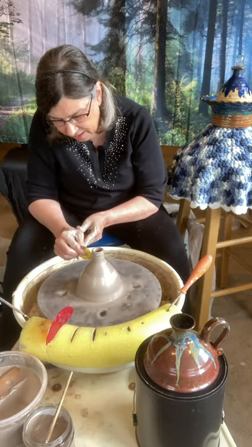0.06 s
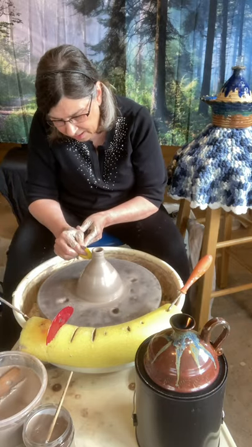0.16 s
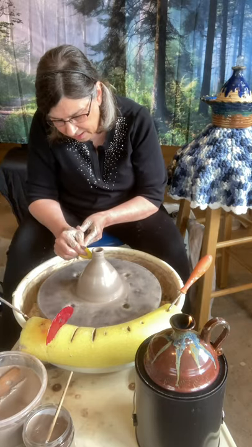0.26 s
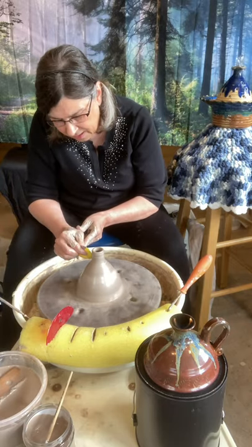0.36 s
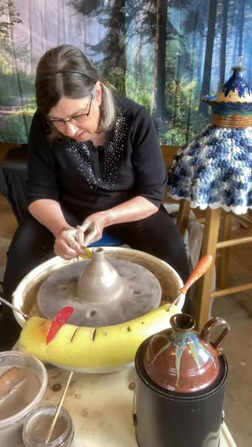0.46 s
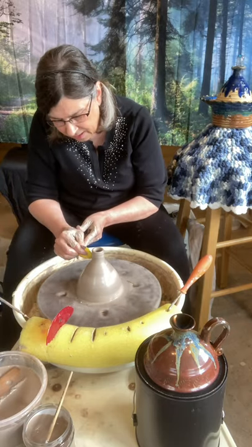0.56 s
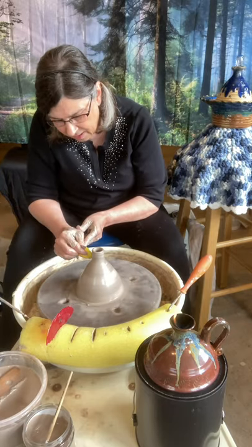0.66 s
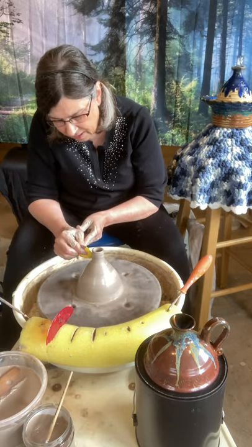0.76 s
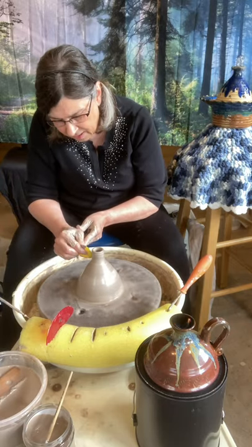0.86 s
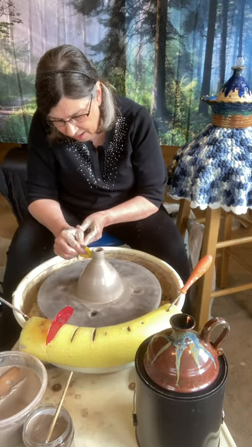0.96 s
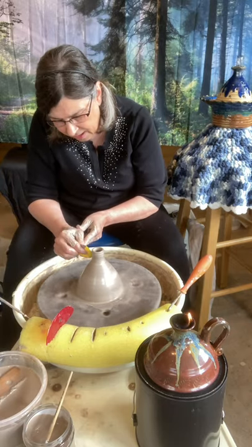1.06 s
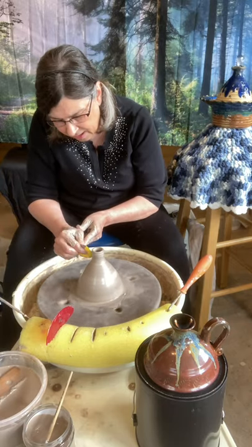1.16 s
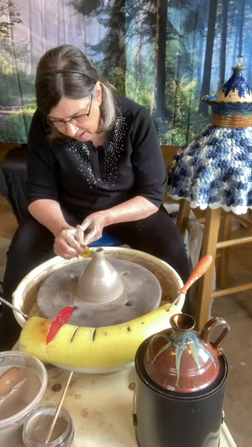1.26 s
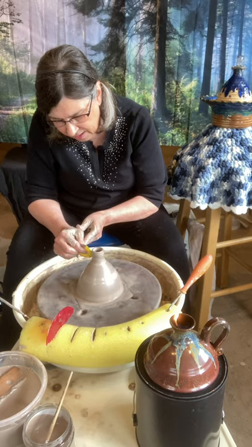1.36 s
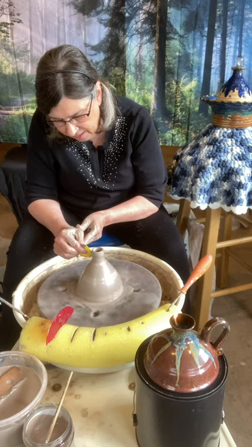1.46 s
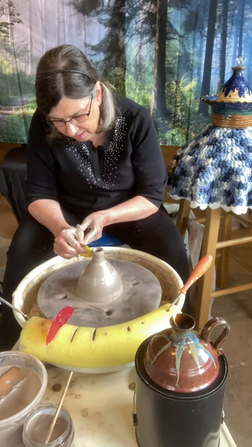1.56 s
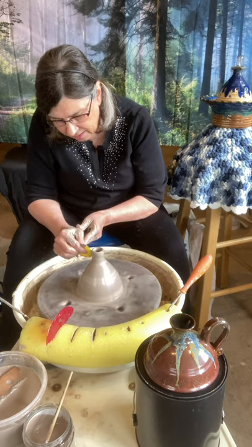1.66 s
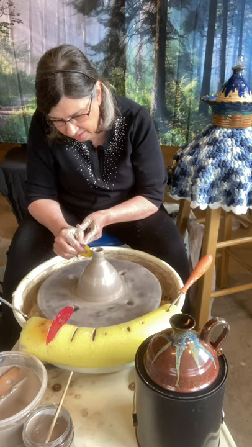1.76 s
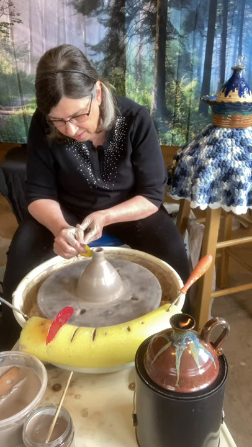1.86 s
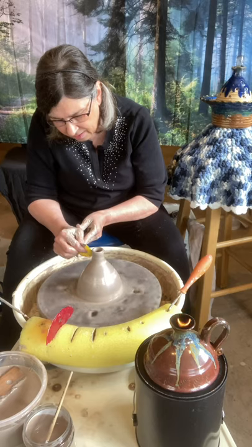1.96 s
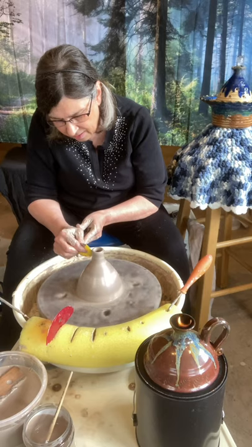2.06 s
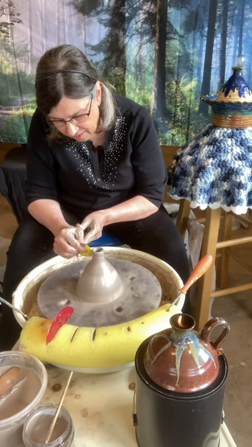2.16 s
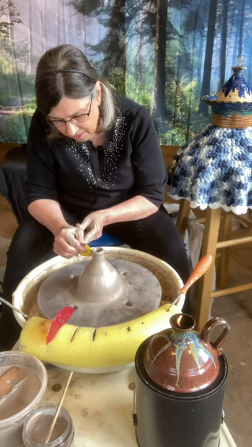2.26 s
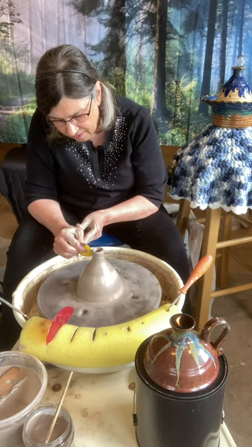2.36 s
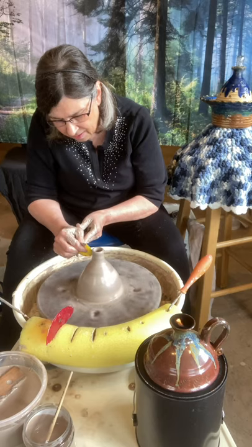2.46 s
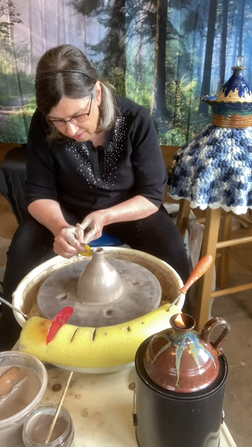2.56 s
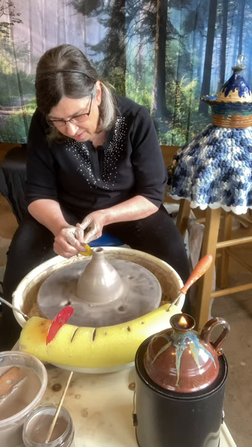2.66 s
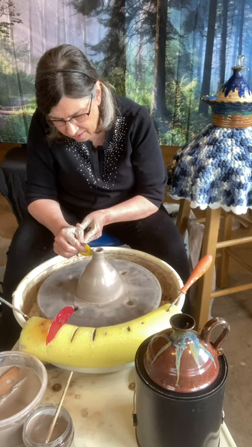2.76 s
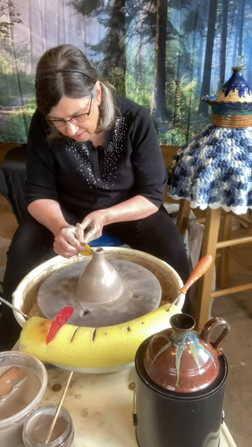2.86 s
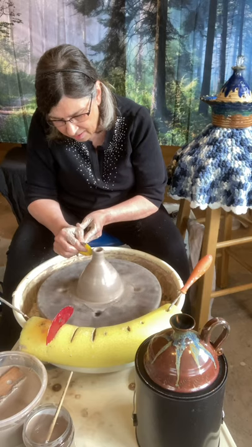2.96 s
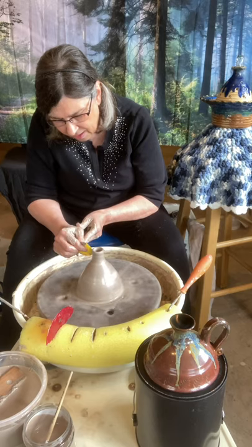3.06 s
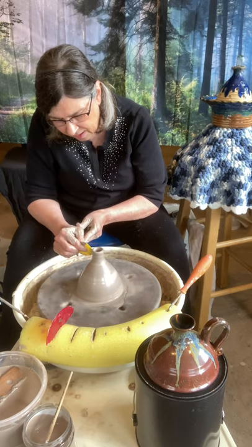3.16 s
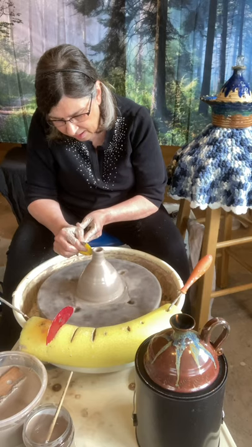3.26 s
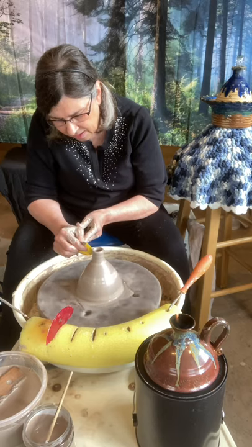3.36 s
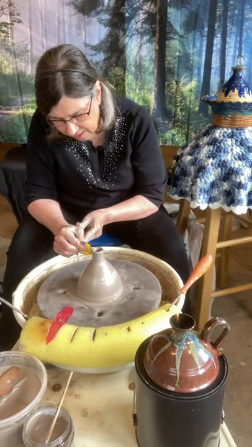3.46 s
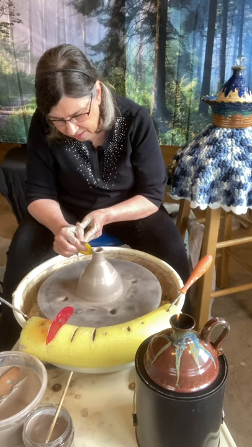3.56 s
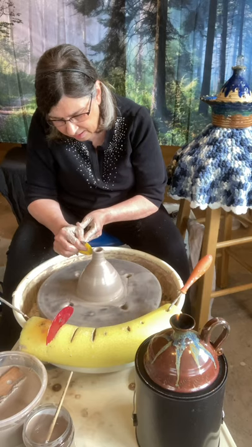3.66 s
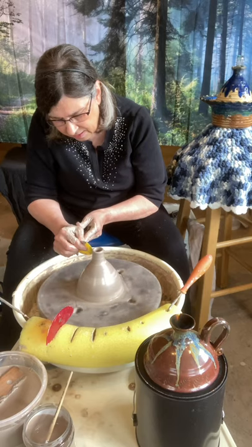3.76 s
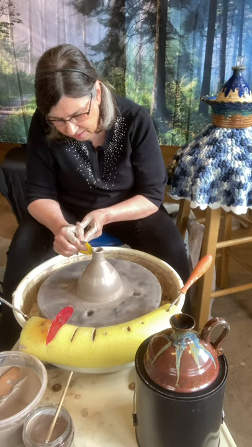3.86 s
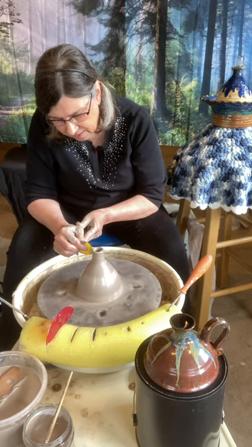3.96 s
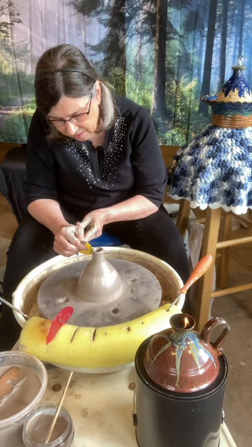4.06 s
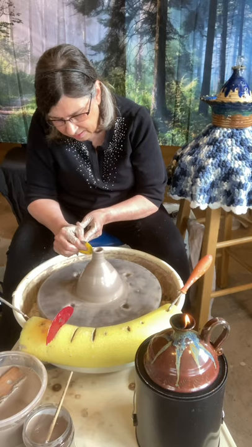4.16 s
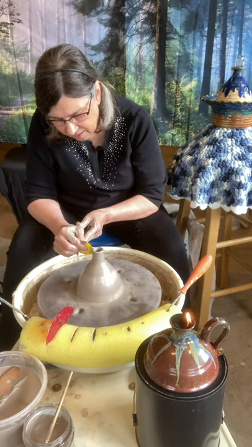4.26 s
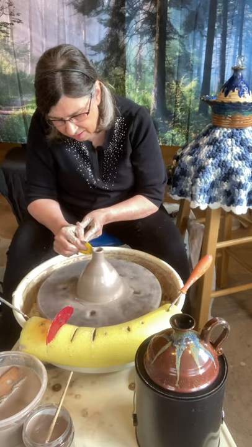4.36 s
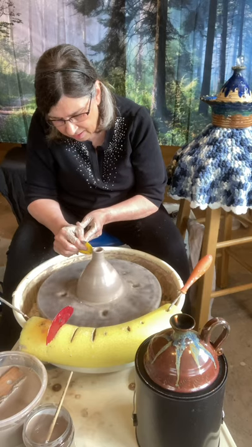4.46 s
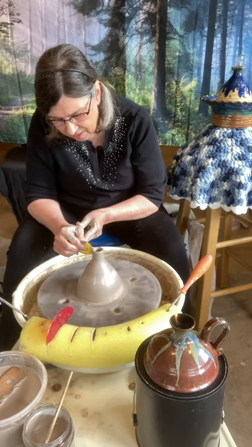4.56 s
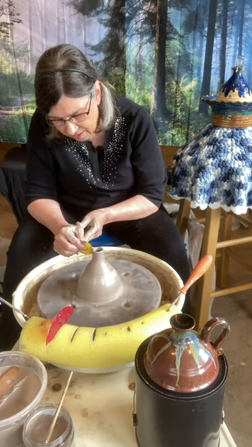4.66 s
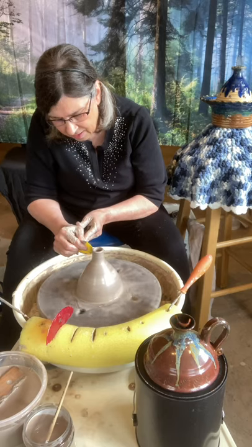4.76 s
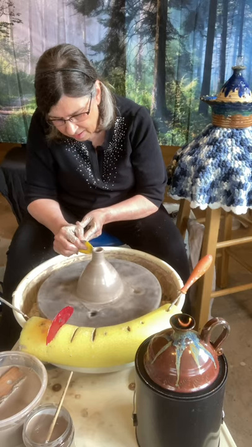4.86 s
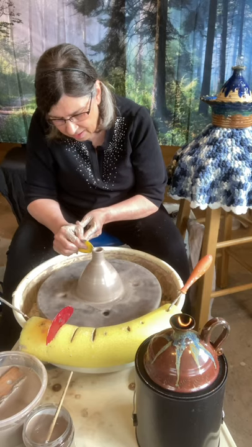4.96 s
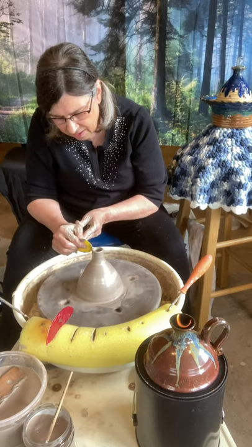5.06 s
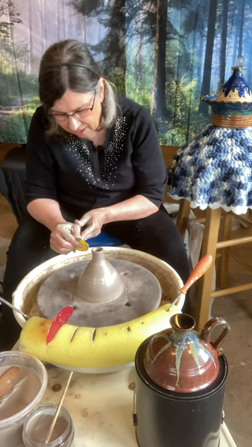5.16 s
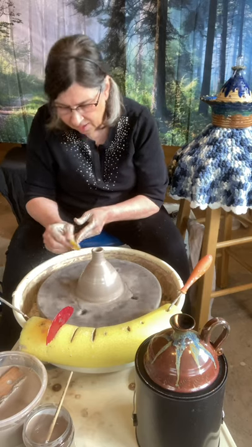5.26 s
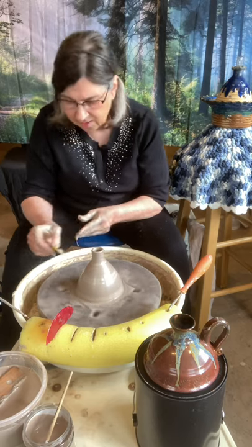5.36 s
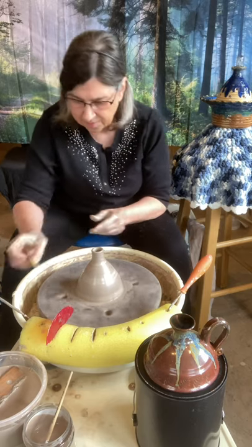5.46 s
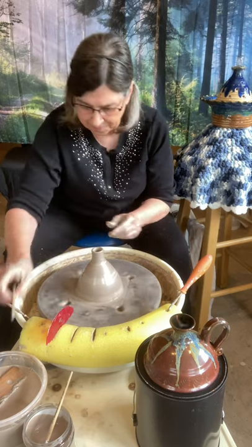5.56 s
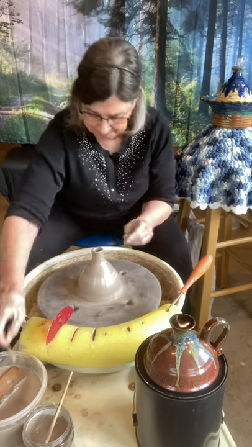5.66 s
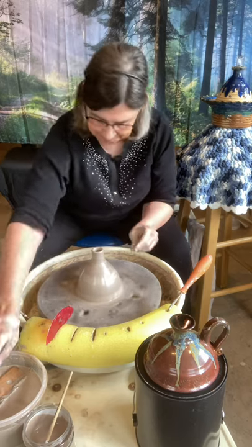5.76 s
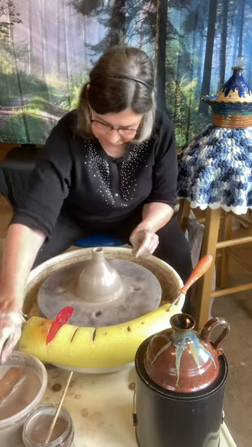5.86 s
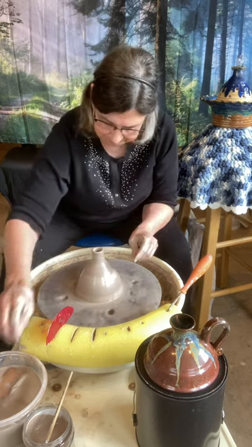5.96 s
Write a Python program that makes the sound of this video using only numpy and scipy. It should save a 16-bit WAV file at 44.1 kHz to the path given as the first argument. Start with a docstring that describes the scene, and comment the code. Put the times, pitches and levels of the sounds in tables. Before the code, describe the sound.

A potter's fingers work wet clay on a slowly turning electric wheel: small squelches, sticky ticks and sharp snaps over a soft, low, pulsing drone. A few fingertip squeaks come midway and near the end, then something is set down with a hollow knock, followed by clicks. Close stereo pickup in a small, fairly dry studio.

```python
"""Wet clay squelches under fingers and a sponge on a slowly turning electric potter's wheel in a small studio.
Each squelch is a cluster of ringing bubbles from a torn film of slip; snaps are struck resonances.
Stick-slip makes the fingertip squeak, and filtered random grains make the rub and crackle.
The wheel drones and throbs as filtered noise and short tone beads; sines make the motor hum.
Near the end something is set down on a table: a sum of decaying modes gives a hollow knock."""
import sys
import numpy as np
from scipy import signal
from scipy.fft import rfft, irfft
from scipy.io import wavfile
from scipy.ndimage import uniform_filter1d

SR = 44100
rng = np.random.default_rng(int(sys.argv[2]) if len(sys.argv) > 2 else 0)


def transcribe(signal):
    """Save signal, clipped to [-1, 1], as a 16-bit WAV file at the path in sys.argv[1]."""
    frames = np.atleast_2d(signal).T
    limited = np.clip(frames, -1, 1)
    pcm = np.round(limited * 32767).astype(np.int16)
    wavfile.write(sys.argv[1], SR, pcm)


N = 264159
TOP_HZ = 15950  # upper band edge of the sound


def undb(db):
    """Logarithmic level: decibels to amplitude gain."""
    return 10 ** (np.asarray(db) / 20)


def level(x, db):
    """Root-mean-square normalization: scale to an rms level."""
    return x * undb(db) / np.sqrt(np.mean(x ** 2))


def add(out, x, s):
    """Superposition: mix x into out from time s on."""
    i = int(np.clip(s * SR, 0, N - 1))
    out[..., i:i + x.shape[-1]] += x[..., :N - i]


def shape(x, points):
    """Spectral weighting by (f/Hz, gain/dB) points joined on a log-frequency axis."""
    hz, db = np.transpose(points)
    f = np.fft.rfftfreq(x.shape[-1], 1 / SR) + 1  # 1 Hz keeps the logarithm finite
    gain = undb(np.interp(np.log(f), np.log(hz), db))
    return irfft(rfft(x) * gain, x.shape[-1])


def ring(x, hz, width_hz):
    """Resonance: a damped second-order system with gain 1 at its centre."""
    b, a = signal.iirpeak(hz, hz / width_hz, fs=SR)
    return signal.lfilter(b, a, x)


def walk(rate):
    """Low-pass random process: a smooth wander of rms 1."""
    k = int(SR / rate)
    steps = np.repeat(rng.standard_normal(N // k + 1), k)
    smooth = uniform_filter1d(uniform_filter1d(steps, k), k)
    return level(smooth[:N], 0)


def fade(t, t60):
    """Exponential damping: decay by 60 dB in t60 seconds."""
    return np.exp(-np.log(1000) * t / t60)


def stereo(mid, side):
    """Sum and difference: left and right from mid and side."""
    return np.array([mid + side, mid - side])


def grains(per_s, scatter_db):
    """Shot noise: clicks at chance times, most of them faint and a few strong."""
    chance, size = rng.random(N), rng.standard_exponential(N)
    sign = rng.choice([-1, 1], N)
    return (chance < per_s / SR) * sign * undb(scatter_db * np.minimum(size, 4))


def room(x, wet_db, side_db, t60=0.15):
    """Reverberation: direct sound plus a short diffuse tail, less wide at long wavelengths."""
    t = np.arange(SR // 2) / SR
    mid, side = rng.standard_normal((2, len(t))) * fade(t, t60) * (t > .004)
    tail = stereo(mid, undb(side_db) * shape(side, [(250, -12), (600, -2.0)]))
    tail /= np.sqrt(np.sum(tail ** 2) / 2)
    wet = signal.fftconvolve(x.mean(0)[None], tail, axes=1)[:, :N]
    return x + undb(wet_db) * wet


# spectrum of drive rumble and faint hiss: (f/Hz, relative density level/dB)
FLOOR_SPECTRUM = [(20, -48), (36, -1.5), (60, 0.5), (100, 2.5), (150, -3), (210, -2.5), (310, -13),
                  (400, -23), (620, -27.5), (800, -31), (1300, -30), (3000, -36), (7000, -28.5),
                  (12000, -24), (16000, -27.5)]
# spatial spread of that floor: (f/Hz, side-to-mid level/dB)
FLOOR_WIDTH = [(40, 0), (100, -9), (220, -2), (400, 4), (900, 10.5), (2400, 9.5), (4500, 4), (6000, 2.5),
               (7500, -23)]


def floor(level_db=-63, waver_db=1):
    """Broadband noise: rumble of the drive that wavers slightly, under an even hiss."""
    mid, side = shape(rng.standard_normal((2, N)), FLOOR_SPECTRUM)
    both = stereo(mid, shape(side, FLOOR_WIDTH)) * undb(level_db) / np.std(mid)
    rumble = signal.sosfilt(signal.butter(1, 300, fs=SR, output="sos"), both)
    return both + rumble * (undb(waver_db * walk(7.1)) - 1)


# mains hum and belt tones of the motor: (f/Hz, rms level/dB)
HUM_TONES = [(83.6, -85.5), (120, -72.5), (167, -73.5)]


def motor(waver_db=2, drift_hz=0.802, side_db=-10):
    """Tonal radiation: mains hum, belt tones and the thin whine of the speed control."""
    out = 0
    whine = (12025, -85.5)  # f/Hz, rms level/dB
    for hz, db in HUM_TONES + [whine]:
        phase = 2 * np.pi * np.cumsum(hz + drift_hz * walk(2.5)) / SR
        tone = stereo(np.sin(phase), undb(side_db) * np.cos(phase))
        out = out + level(tone * undb(waver_db * walk(33)), db)
    return out


def load_db(turn_hz=1.344, heavy_spot_s=0.016, swing_db=1.5, flutter_db=1.0):
    """Periodic modulation: the load on the wheel peaks once a turn, and flutters."""
    t = np.arange(N) / SR
    swing = swing_db * np.cos(2 * np.pi * turn_hz * (t - heavy_spot_s))
    return swing + flutter_db * walk(35.0)


def splash_pan(load, hz=545, width_hz=55, db=-78.5, follow=0.22, flutter_db=5):
    """Sympathetic resonance: the splash pan sings along faintly in fluttering puffs."""
    song = ring(ring(rng.standard_normal((2, N)), hz, width_hz), hz, 2 * width_hz)
    puffs_db = follow * load + flutter_db * np.tanh(2 * walk(32))
    return level(song * undb(puffs_db), db)


# resonances of the wheel's frame: (f/Hz, nominal width/Hz before widening, relative level/dB)
FRAME_MODES = [(247.7, 15, -1.5), (231.3, 15, -10.5), (274.3, 7.5, -11)]


def frame_noise(widen=1.7):
    """Modal superposition: noise through every resonance of the frame."""
    out = 0
    for hz, width, db in FRAME_MODES:
        width = widen * width
        mode = ring(ring(rng.standard_normal(N), hz, width), hz, width)
        out = out + undb(db) * level(mode, 0)
    return out


def wheel(load, drive_db=-61.5, evenness=0.46, side_db=-19, frame_hz=248, frame_width_hz=48):
    """Forced vibration: bearing roughness rings the frame, swelling with the load of each turn."""
    mid, side = frame_noise(), frame_noise()
    # the drive pushes more steadily than pure chance would
    power = np.maximum(uniform_filter1d(mid ** 2, SR // 20), 1e-6)
    mid = mid / power ** (evenness / 2)
    drone = stereo(level(mid, 0), level(side, side_db)) * undb(drive_db + load)
    return ring(drone, frame_hz, frame_width_hz)


# beads of the throbbing drone: (t/s, peak level/dB before the common gain)
THROB_BEADS = [(0.065, -48.5), (0.116, -56), (0.166, -60), (0.597, -48), (0.696, -52), (0.765, -47),
               (0.807, -42.5), (0.971, -50), (1.178, -65), (1.295, -54.5), (1.354, -50), (1.406, -52.5),
               (1.514, -51), (1.569, -49), (1.636, -45), (1.76, -51), (1.827, -54.0), (1.977, -51.5),
               (2.019, -49.5), (2.097, -58), (2.28, -45), (2.332, -50.5), (2.367, -56), (2.43, -43),
               (2.517, -53.5), (2.558, -48), (2.673, -58), (2.83, -47), (2.871, -60), (2.911, -53.5),
               (2.957, -52), (3.065, -45.5), (3.113, -49.5), (3.259, -50), (3.376, -48), (3.409, -48.5),
               (3.573, -49), (3.647, -51.0), (3.739, -40.5), (3.809, -48.5), (3.881, -48), (4, -53),
               (4.045, -48), (4.256, -50.5), (4.312, -46.5), (4.393, -50), (4.449, -44), (4.634, -50),
               (4.721, -56), (4.912, -49), (4.942, -48), (5.034, -53.0), (5.063, -49), (5.172, -45.5),
               (5.244, -57), (5.293, -46), (5.343, -56), (5.432, -53.5), (5.474, -56), (5.615, -45.5),
               (5.728, -60), (5.97, -52)]


def throbs(hz=246.6, half_width_s=0.017, gain_db=-1.5, detune=0.029, balance_db=0.1):
    """Amplitude modulation: the main frame tone swells and dies in beads, each a little off pitch."""
    out, t = np.zeros((2, N)), np.arange(-(SR // 16), SR // 16) / SR
    sides_db = np.array([[balance_db], [-balance_db]]) / 2
    chances = rng.uniform(-0.8, 1, (len(THROB_BEADS), 2))
    for (s, db), (pitch, phase) in zip(THROB_BEADS, chances):
        tone = np.sin(2 * np.pi * hz * (1 + detune * pitch) * t + np.pi * phase)
        bead = tone * np.exp(-(t / half_width_s) ** 2)
        add(out, undb(db + gain_db + sides_db) * bead, s + t[0])
    return out


# modes of the table, broad thuds of its top among them: (f/Hz, relative level/dB, t60/s)
TABLE_MODES = [(120, -32, 0.24), (245.3, -29, 0.54), (307, -29, 0.24), (360.4, -24.5, 0.14),
               (420, -6.5, 0.086), (447, 5.5, 0.038), (462.7, -16.5, 0.19), (500, 1, 0.043),
               (596.4, -7, 0.11), (697, -0.5, 0.029), (723, -5.5, 0.067), (765, 10, 0.035),
               (801, -6.5, 0.069), (835, 4, 0.045), (935, -15.5, 0.1), (1027, -14.5, 0.07),
               (1070, 17, 0.0075), (1144, -26, 0.099), (1310, -27.5, 0.1), (1505, -27.5, 0.12),
               (1565, 4.5, 0.008)]
# the thing set down lands, then rocks onto its other edge: (t/s, gain level/dB)
KNOCK_BLOWS = [(5.788, -10), (5.7987, -23.5)]


def knock(build_s=0.0077, crack_db=-26, crack_hz=1600, crack_t60=0.0073, waver_db=3.5):
    """Modal impact: a dull crack, then table modes that build as the wave crosses the top."""
    out, t = np.zeros((2, N)), np.arange(SR // 2) / SR
    body = 0
    for hz, db, t60 in TABLE_MODES:
        # each ring wavers in level at random, more so as it dies away
        wander = level(uniform_filter1d(rng.standard_normal(len(t)), SR // 90), 0)
        waver = undb(waver_db * (1 - fade(t, 0.29)) * wander)
        body = body + undb(db) * np.sin(2 * np.pi * hz * t) * fade(t, t60) * waver
    for s, db in KNOCK_BLOWS:
        burst = rng.standard_normal(len(t)) * fade(t, crack_t60)
        crack = ring(ring(burst, crack_hz, 380), crack_hz, 540)
        crack = crack / np.std(crack[:SR // 200])
        blow = body * (1 - np.exp(-t / build_s)) + undb(crack_db) * crack
        add(out, undb(db) * blow, s)
    return out


def rattle(db=-78, hz=2900, width_hz=1500, t60=0.08):
    """Secondary impacts: the first blow sets loose tools on the table chattering faintly."""
    since = np.arange(N) / SR - KNOCK_BLOWS[0][0]
    clicks = np.array([grains(820, 2.4), grains(1200, 2.4)])
    clicks = clicks * (since > 0) * fade(np.abs(since), t60)
    return level(ring(ring(clicks, hz, width_hz), hz, 2 * width_hz), db)


# activity of the faint wet patter between the squelches: (t/s, relative level/dB)
WET_ACTIVITY = [(0, -0.5), (1.4, 0), (2.2, -1.5), (3.0, -2), (3.7, 1), (4.05, -2), (4.2, 3), (4.6, -3),
                (5.4, 4), (5.65, 4.5), (5.99, 17)]


def activity_db(s):
    """Envelope: how busy the wet patter is at time s, interpolated in decibels."""
    return np.interp(s, *np.transpose(WET_ACTIVITY))


def film(db=-78, hz=3600, patchy_db=5):
    """Crackling noise: the wet skin of the pot lets off random resonant grains in patches."""
    busy_db = activity_db(np.arange(N) / SR) + patchy_db * walk(24.04)
    clicks = np.array([grains(700, 1.5), grains(700, 5)])
    crackle = ring(ring(clicks, hz, 3200), hz, 4600)
    return level(crackle * undb(busy_db), db)


# sharp snaps of wet clay, and at last clicks of tools: (t/s, peak level/dB before the common gain, f/Hz)
SHARP_SNAPS = [(.231, -32.5, 10900), (0.3645, -38, 13200), (0.3645, -59, 2420), (0.516, -46, 2330),
               (.6615, -44.5, 4300), (.9137, -43, 14000), (1.0143, -37, 7800), (1.525, -38.5, 2960),
               (1.8255, -46, 7200), (2.399, -50, 6500), (2.9115, -37.5, 10700), (2.9794, -51, 7960),
               (3.374, -46, 3540), (3.925, -41, 12200), (4.229, -48, 2640), (4.356, -44.5, 12400),
               (4.903, -46, 14100), (4.9493, -43, 13700), (4.997, -47, 14000), (5.014, -47, 13800),
               (5.42, -43.5, 9080), (5.4765, -38.5, 13000), (5.4765, -62, 2980), (5.705, -48, 3660),
               (5.727, -50, 7040), (5.7885, -40.5, 13200), (5.8423, -35, 7550), (5.854, -39, 8300),
               (5.904, -46.5, 7700), (5.968, -40, 3330), (5.9692, -53, 11500)]


def snaps(gain_db=-2.0, t60=0.0074, width=0.16, splash=0.44):
    """Impulse response: each snap or click is a sharp tick in a short burst of noisy splash."""
    out, t = np.zeros((2, N)), np.arange(SR // 50) / SR
    for s, db, hz in SHARP_SNAPS:
        burst = (t == 0) + splash * rng.standard_normal(len(t)) * fade(t, t60)
        snap = ring(ring(burst, hz, width * hz), hz, 2 * width * hz)
        add(out, snap / np.abs(snap).max() * undb(db + gain_db), s)
    return out


def rub(db=-75, low_hz=2200, step_octaves=0.387, tilt_db=-1.5, grip_db=-1.0, patchy_db=6.0):
    """Friction noise: the sponge grips and slides in gritty swishes that shift in colour."""
    grip = activity_db(np.arange(N) / SR) + grip_db * np.tanh(walk(13))
    out = 0
    for k in range(6):
        hz = low_hz * 2 ** (step_octaves * k)
        clicks = np.array([grains(1500, 1.7), grains(1100, 2)])
        grit = ring(ring(clicks, hz, .3 * hz), hz, .3 * hz)
        patches = patchy_db * np.minimum(walk(32), 1.5)
        out = out + level(grit * undb(grip + patches), tilt_db * k)
    return level(out, db)


# a fingertip squeaks on the wet neck of the pot: (t/s, f/Hz, length/s, peak level/dB before common gain)
FINGER_SQUEAKS = [(3.554, 2005, .06, -46), (3.754, 1994, 0.068, -46.5), (3.807, 2810, 0.03, -46),
                  (5.106, 2068, .05, -55), (5.198, 1900, .025, -46)]


def squeaks(gain_db=-2, waver=0.0314, rough_db=2.0, attack_s=0.0056):
    """Stick-slip oscillation: a fingertip settles into a short wavering tone, then loses its grip."""
    out, wander, grit = np.zeros((2, N)), walk(300), walk(220)
    for s, hz, length, db in FINGER_SQUEAKS:
        t = np.arange(int(length * SR)) / SR
        span = slice(int(s * SR), int(s * SR) + len(t))
        phase = 2 * np.pi * np.cumsum(hz * (1 + waver * wander[span])) / SR
        grip = np.minimum(t / attack_s, 1) * (1 - t / length)
        add(out, np.sin(phase) * grip * undb(db + gain_db + rough_db * grit[span]), s)
    return out


def squelch(hz, spread, length, bubble_rate=1200, purity=0.52, scatter_db=6.5, glide=0.00031,
            swell_db=11, port_phase=1.61, rise_octaves_per_s=2.1, crest=0.9):
    """Bubble resonance: a tearing film rings tiny bubbles in turn, rising slightly as the cluster drifts."""
    count = min(4 + int(bubble_rate * length * (1 + 2 * spread)), 64)
    pitch, size, phase, jitter = rng.standard_normal((64, 4))[:count].T[..., None]
    # an even film gives like bubbles that ring long, a ragged one short mixed ticks
    cycles = np.clip(purity / spread, .6, 6)
    t = np.arange(int(10 * cycles / hz * SR) + 2) / SR
    progress = (np.arange(count)[:, None] + .5 + np.tanh(jitter) / 2) / count
    scatter = 1.195 * spread * np.tanh(.65 * pitch)
    drift = rise_octaves_per_s * length * (progress - .5)
    f = np.clip(hz * 2 ** (scatter + drift), 700, 15500)
    age = f * t / cycles
    turn = 2 * np.pi * f * t * (1 + glide * np.minimum(age, 10))
    # the tear gathers pace, then runs out
    strength = undb(scatter_db * size + swell_db * np.sin(np.pi * progress ** crest))
    bubbles = strength * np.sqrt(f) * age * np.exp(-age)
    # reflections from the splash pan bring the lower bubbles to the two sides out of step
    apart = port_phase * phase * np.where(f < 6000, 1, .12) / 2
    when = ((length * progress * SR).astype(int) + np.arange(len(t))).ravel()
    out = np.array([np.bincount(when, (bubbles * np.sin(turn + lag)).ravel())
                    for lag in (apart, -apart)])
    return out * np.sqrt(2 * length * SR / np.sum(out ** 2))


def fizz(count, centre_hz, octaves, spread, length, db, scatter_db, hands_off_s=5.65):
    """Bubble noise: faint small squelches go on wherever clay slides under skin, till the hands lift."""
    out = np.zeros((2, N))
    for k, (when, pitch, size) in enumerate(rng.uniform(-0.9, 1, (count, 3))):
        s = (k + .5 + when / 2) / count * hands_off_s
        hz = centre_hz * 2 ** (octaves * pitch)
        gain = undb(db + activity_db(s) + scatter_db * size)
        add(out, gain * squelch(hz, spread, length), s)
    return out


# the loudest squelches, under the fingers and at last on the tools:
# (t/s, centre f/Hz, relative pitch spread, length/s, level/dB before the common gain)
SLIP_TEARS = [(.008, 2230, 0.18, 0.025, -50), (0.057, 1134, 0.11, 0.0082, -57.5),
              (0.063, 2900, 0.4, 0.022, -56), (0.147, 2370, 0.18, 0.015, -55),
              (0.228, 4400, 0.49, 0.032, -51), (.229, 9150, 0.62, 0.013, -45.5),
              (0.254, 2340, 0.14, 0.015, -48.5), (0.273, 3870, 0.13, 0.02, -58),
              (0.317, 8100, 0.15, 0.011, -59), (0.366, 2355, 0.17, 0.01, -48.5),
              (0.433, 3370, 0.16, 0.022, -57), (0.515, 2490, 0.24, 0.058, -51.5),
              (0.558, 2900, 0.19, 0.027, -61), (0.609, 2920, 0.17, .02, -65),
              (.62, 4370, 0.084, 0.012, -55), (.647, 2460, 0.2, 0.027, -57.5),
              (.65, 4240, 0.14, 0.026, -55.5), (0.732, 4880, 0.1, .02, -65.5),
              (0.767, 2050, 0.074, 0.045, -55.5), (0.78, 4390, 0.1, 0.021, -64),
              (0.871, 5600, 0.095, .02, -61.5), (0.877, 1850, 0.085, 0.016, -57),
              (0.923, 5430, 0.093, 0.027, -57.5), (0.953, 4280, 0.18, 0.029, -55),
              (1.006, 7740, 0.13, 0.018, -55.5), (1.016, 2640, 0.2, 0.016, -61),
              (1.15, 1970, 0.17, 0.01, -53), (1.158, 8700, 0.12, 0.013, -55.5),
              (1.238, 7900, 0.13, 0.017, -63), (1.265, 2360, 0.15, 0.015, -51.5),
              (1.318, 2420, 0.19, 0.016, -49.5), (1.328, 8100, 0.15, 0.018, -60.5),
              (1.365, 5900, 0.13, 0.045, -57), (1.377, 2690, .3, 0.032, -52.5),
              (1.372, 10300, 0.11, 0.012, -56.5), (1.429, 2550, 0.12, 0.026, -56.5),
              (1.521, 2357, .11, 0.015, -40.5), (1.522, 5350, 0.97, 0.025, -49.5),
              (1.525, 1120, 0.062, 0.0063, -59), (1.544, 2600, .2, 0.036, -53.5),
              (1.582, 2170, 0.26, 0.037, -54.5), (1.759, 2880, 0.16, 0.024, -60.5),
              (1.763, 4180, 0.16, 0.031, -59.5), (1.77, 6500, 0.24, 0.018, -56.5),
              (1.794, 2530, 0.094, .018, -58), (1.826, 6900, 0.19, 0.032, -59),
              (1.836, 2350, 0.18, 0.03, -54), (1.866, 3600, 0.14, 0.023, -59.5),
              (1.933, 3040, 0.16, 0.018, -58), (1.932, 6650, .15, 0.014, -63),
              (1.975, 3010, .13, 0.028, -53), (1.984, 6640, 0.13, 0.019, -63),
              (2.028, 4890, 0.16, 0.024, -54), (2.138, 4530, 0.16, 0.028, -64.5),
              (2.221, 2820, 0.17, 0.017, -58.5), (2.226, 5800, 0.11, 0.027, -62),
              (2.311, 2860, 0.17, 0.028, -63.5), (2.388, 3830, 0.16, 0.078, -60),
              (2.397, 7500, 0.56, 0.037, -52.5), (2.469, 2740, 0.16, 0.022, -60.5),
              (2.538, 4800, 0.094, 0.024, -61.5), (2.588, 6240, 0.13, 0.028, -60.5),
              (2.589, 2470, 0.29, 0.042, -64), (2.68, 4800, 0.16, 0.013, -58),
              (2.719, 3120, 0.15, 0.013, -57), (2.751, 2170, 0.26, 0.016, -57.5),
              (2.795, 2140, 0.23, 0.02, -57.5), (2.826, 5950, 0.082, 0.016, -62),
              (2.91, 3760, 0.069, 0.017, -59), (2.969, 7960, 0.18, 0.019, -53),
              (3.005, 1625, .12, 0.013, -64.5), (3.046, 9700, 0.087, 0.015, -60.5),
              (3.066, 2690, 0.19, 0.019, -58.5), (3.124, 2165, 0.2, 0.024, -59.5),
              (3.194, 1620, 0.11, 0.016, -56.5), (3.253, 9000, 0.16, 0.041, -53),
              (3.322, 3170, 0.37, 0.041, -56), (3.366, 3400, 0.27, 0.027, -50.5),
              (3.363, 9500, .1, 0.012, -57), (3.4, 4340, .13, 0.02, -59.5), (3.445, 5120, 0.13, 0.041, -64),
              (3.479, 3770, 0.086, 0.019, -59.5), (3.52, 4000, 0.16, 0.035, -54.5),
              (3.556, 2016, 0.1, 0.028, -47.5), (3.619, 5830, 0.21, 0.025, -51.5),
              (3.623, 2735, 0.062, 0.011, -49.5), (3.699, 3350, 0.44, 0.048, -60),
              (3.756, 2010, 0.095, 0.019, -45), (3.772, 2900, 0.063, 0.021, -51.5),
              (3.774, 2090, .16, 0.012, -45), (3.808, 2920, 0.098, 0.012, -43),
              (3.81, 3850, 0.29, 0.015, -57), (3.817, 7700, 0.21, 0.015, -62),
              (3.854, 2710, .15, 0.017, -54), (3.876, 4100, 0.22, 0.018, -52.5),
              (3.929, 12800, 0.17, 0.013, -51), (3.955, 2430, 0.19, 0.024, -61),
              (4.136, 3770, 0.18, 0.038, -58.5), (4.141, 5800, 0.13, .045, -59.5),
              (4.17, 8100, 0.087, .016, -65), (4.182, 2580, 0.19, 0.029, -59.5),
              (4.228, 2470, 0.26, 0.018, -47), (4.269, 5130, 0.088, 0.027, -58.5),
              (4.27, 3520, 0.13, 0.022, -58), (4.297, 9860, 0.083, 0.022, -56),
              (4.307, 3630, 0.23, 0.016, -58), (4.411, 4450, 0.098, 0.02, -52),
              (4.402, 2380, 0.11, 0.01, -66), (4.435, 6280, .1, .018, -62),
              (4.471, 4630, 0.075, 0.023, -59.5), (4.509, 4200, 0.13, 0.02, -54),
              (4.502, 2500, 0.1, 0.02, -54), (4.566, 5420, 0.22, 0.033, -55.5),
              (4.564, 10500, 0.33, 0.041, -56), (4.57, 2440, 0.31, 0.028, -56.5),
              (4.607, 2460, 0.11, 0.013, -51.5), (4.668, 4200, 0.27, .022, -59.5),
              (4.688, 8200, 0.14, 0.023, -58.5), (4.701, 2430, 0.26, 0.032, -54),
              (4.737, 3940, 0.19, 0.019, -44), (4.767, 3320, 0.19, 0.021, -55.5),
              (4.791, 2670, 0.068, .019, -50.5), (4.813, 4030, .18, 0.021, -53),
              (4.87, 1626, 0.16, 0.024, -53), (4.945, 4130, 0.11, 0.015, -61),
              (4.966, 3620, 0.32, 0.039, -56), (5.03, 2700, 0.12, 0.026, -64.5),
              (5.07, 2370, 0.2, 0.042, -58.5), (5.102, 2092, 0.1, 0.026, -49.5),
              (5.153, 2950, 0.45, 0.051, -57), (5.142, 4670, 0.31, 0.026, -60),
              (5.149, 9500, .1, 0.014, -62), (5.193, 1896, 0.093, 0.015, -44),
              (5.233, 1970, 0.26, 0.017, -60), (5.263, 1850, 0.54, .02, -55),
              (5.346, 2980, 0.23, 0.025, -45.5), (5.373, 2500, 0.23, 0.025, -49),
              (5.448, 1850, 0.21, 0.024, -58.5), (5.512, 3530, 0.12, 0.018, -60.5),
              (5.521, 5500, 0.1, 0.035, -58.5), (5.576, 4040, 0.15, .02, -63),
              (5.602, 3000, 0.15, 0.019, -62.5), (5.698, 3480, 0.42, 0.026, -47.5),
              (5.721, 3700, 0.27, 0.033, -58), (5.84, 8230, 0.11, 0.013, -52.5),
              (5.851, 2450, 0.14, 0.031, -53.5), (5.868, 3720, 0.12, .016, -64),
              (5.891, 1890, 0.18, .01, -49), (5.912, 4730, 0.12, 0.013, -61),
              (5.966, 1720, 0.46, 0.0098, -38), (5.967, 3320, 0.15, 0.012, -41.5),
              (5.961, 8100, 0.5, 0.025, -47)]


def slip(gain_db=-5, spray_db=-19.0, spray_ratio=1.317, spray_spread=0.49, spray_stretch=2.1):
    """Bubble clusters: distinct squelches, each in a looser spray of mostly higher-pitched bubbles."""
    out = np.zeros((2, N))
    for s, hz, spread, length, db in SLIP_TEARS:
        add(out, undb(db + gain_db) * squelch(hz, spread, length), s)
        spray_hz = min(spray_ratio * hz, max(hz, TOP_HZ / 2))
        spray = squelch(spray_hz, spray_spread, spray_stretch * length)
        add(out, undb(db + gain_db + spray_db) * spray, s - length / 5)
    return out


def scene():
    """Superposition of sources: clay, wheel and table in one small room."""
    load = load_db()
    machine = floor() + motor() + splash_pan(load) + wheel(load) + throbs()
    table = room(knock() + rattle(), wet_db=-11.0, side_db=2.5, t60=0.16)
    ticks = room(film() + snaps(), wet_db=1.5, side_db=7)
    gulps = fizz(count=26, centre_hz=1140, octaves=0.35, spread=0.27, length=0.019, db=-81, scatter_db=6.0)
    smears = fizz(count=120, centre_hz=2900, octaves=0.62, spread=0.13, length=0.017, db=-75.5,
                  scatter_db=2.5)
    smacks = fizz(count=80, centre_hz=5800, octaves=0.665, spread=0.13, length=0.021, db=-76.5,
                  scatter_db=3)
    pops = fizz(count=70, centre_hz=9000, octaves=0.4, spread=0.12, length=0.014, db=-71, scatter_db=5.5)
    patter = gulps + smears + smacks + pops
    clay = room(rub() + squeaks() + patter + slip(), wet_db=-1.0, side_db=0.5)
    return machine + table + ticks + clay


def record(dry):
    """Mid-side weighting and band limit: wide in the middle range, near mono treble, no extreme top."""
    width = [(600, 5.0), (1500, 1.0), (4500, 1.5), (6000, -5.0), (7500, -32)]  # f/Hz, side gain/dB
    side = shape((dry[0] - dry[1]) / 2, width)
    low_pass = signal.ellip(8, .2, 70, TOP_HZ, fs=SR, output="sos")
    return signal.sosfilt(low_pass, stereo(dry.mean(0), side))


dry = scene()
out = record(dry)
transcribe(out)
```